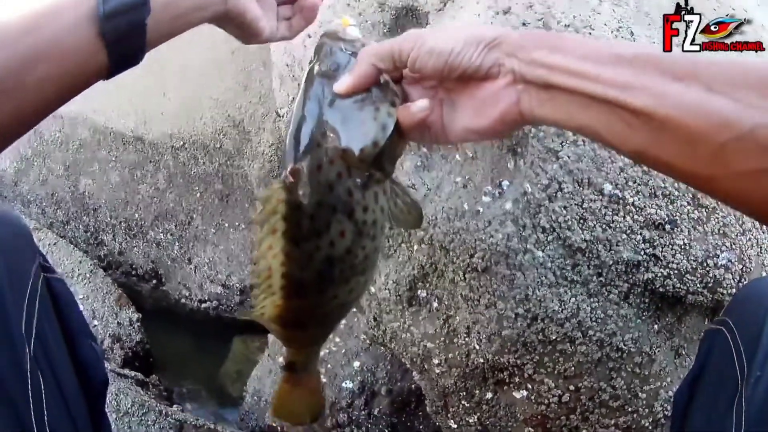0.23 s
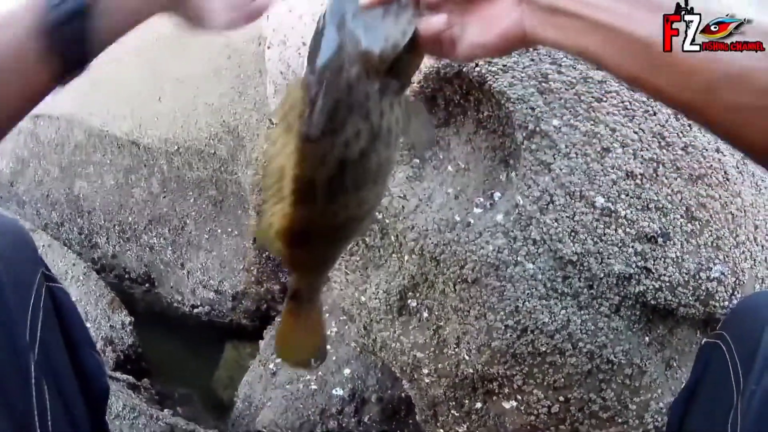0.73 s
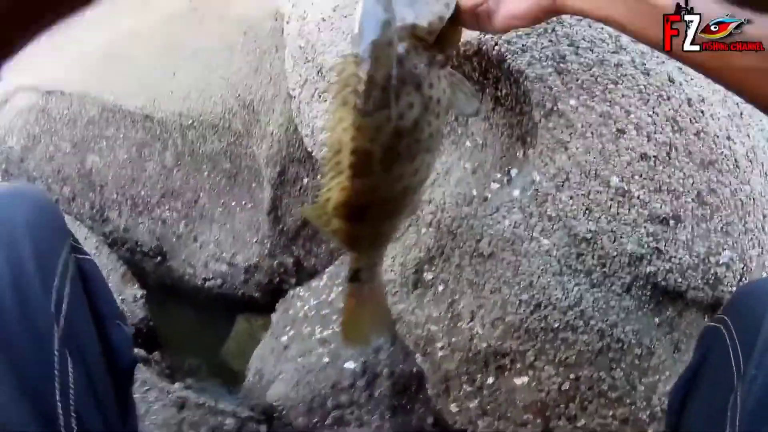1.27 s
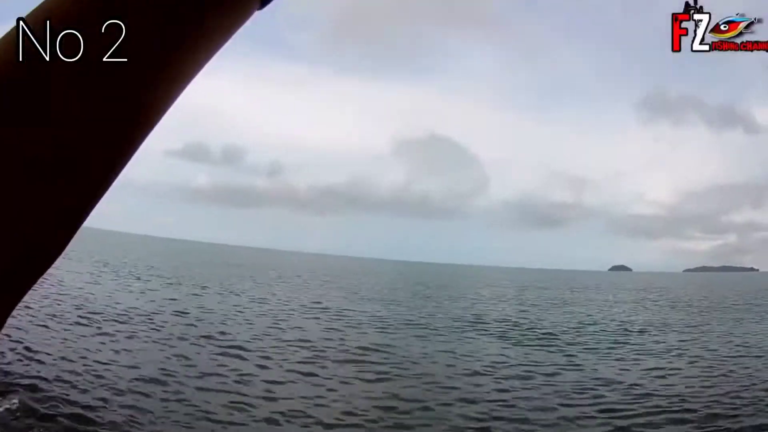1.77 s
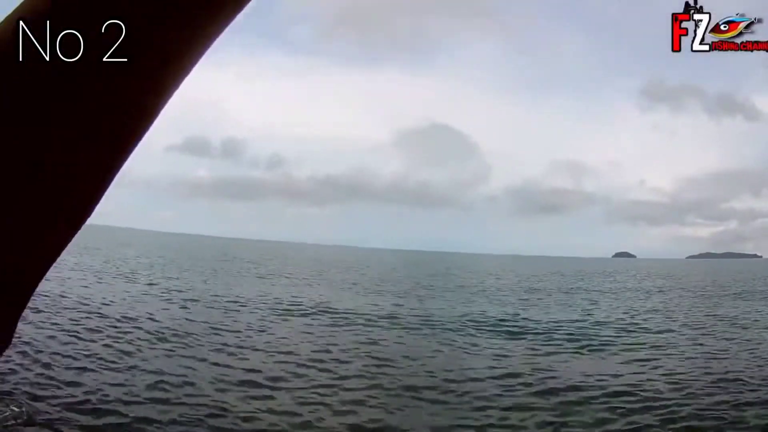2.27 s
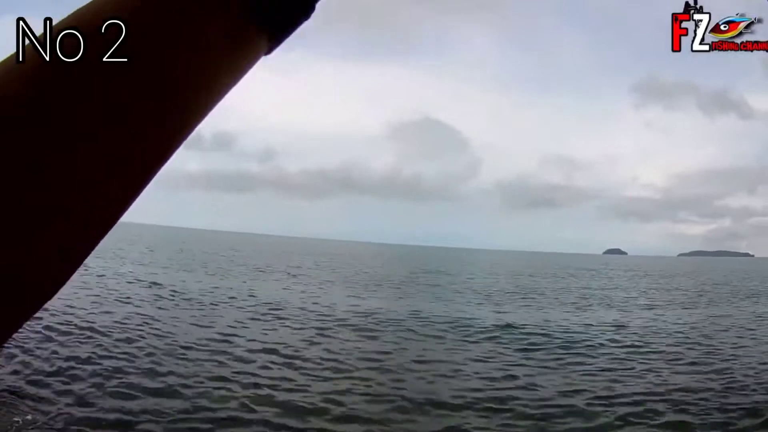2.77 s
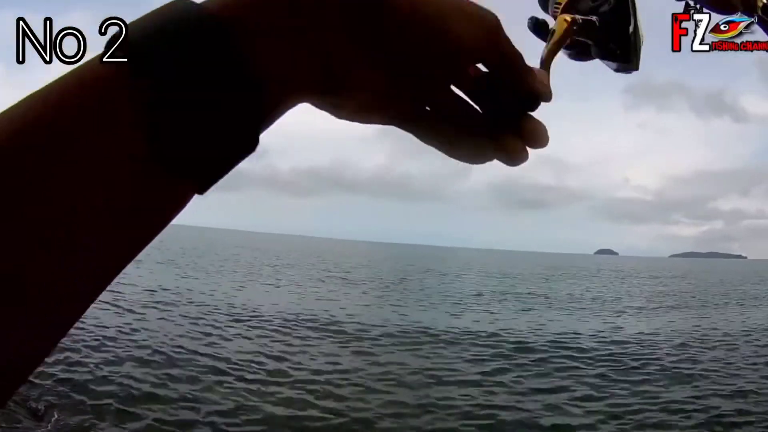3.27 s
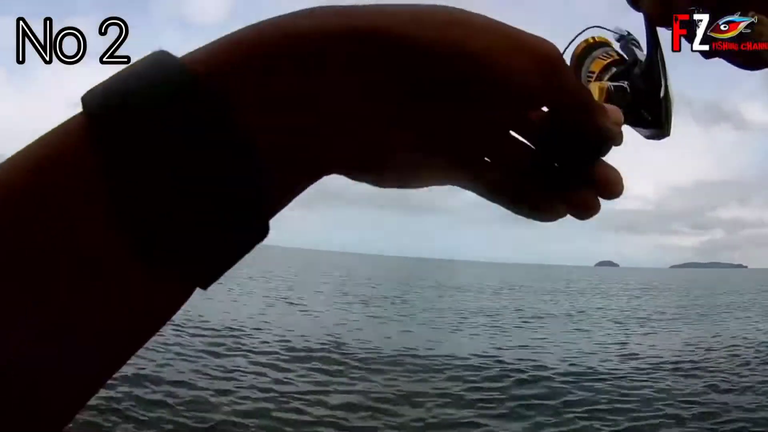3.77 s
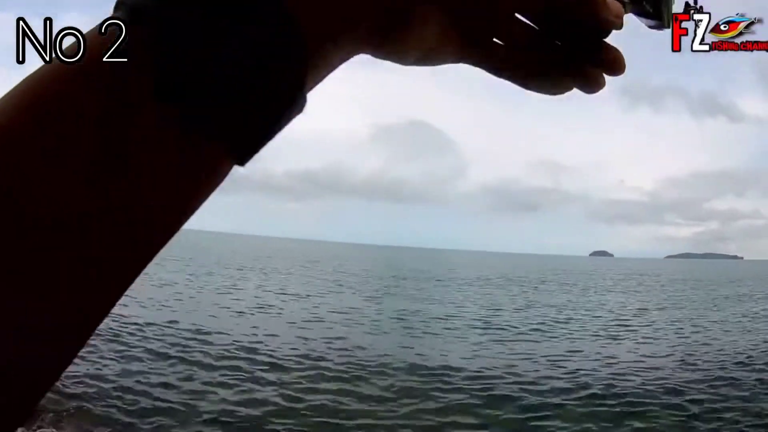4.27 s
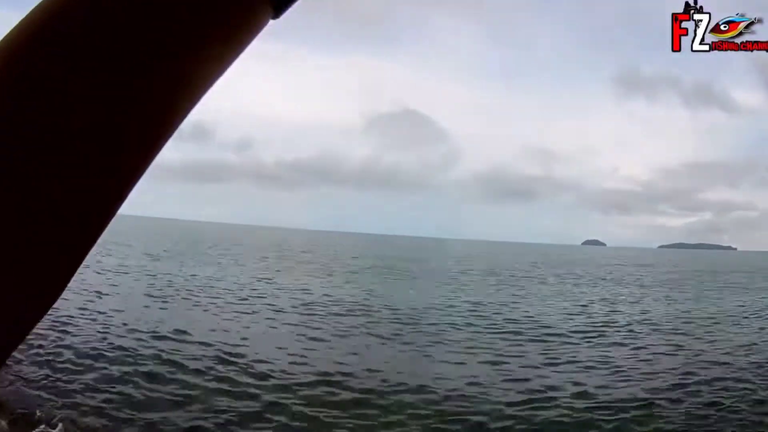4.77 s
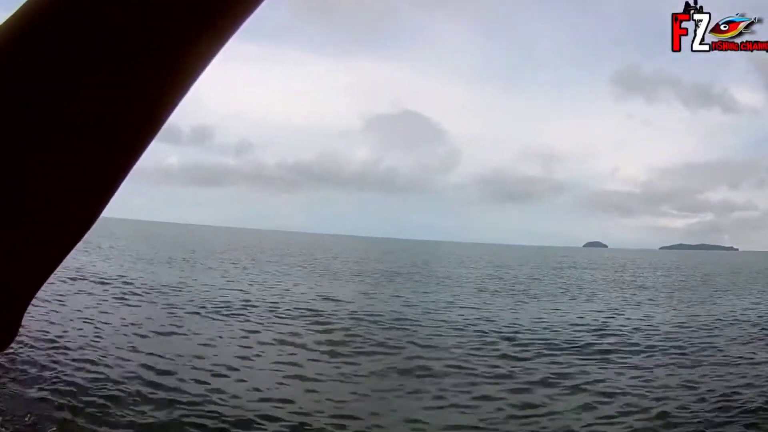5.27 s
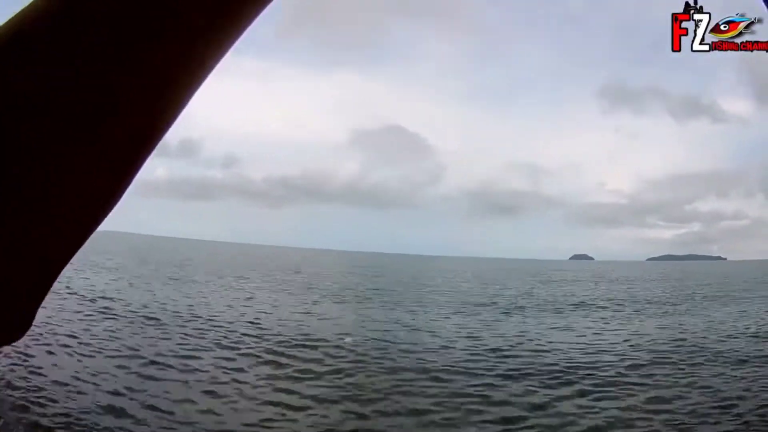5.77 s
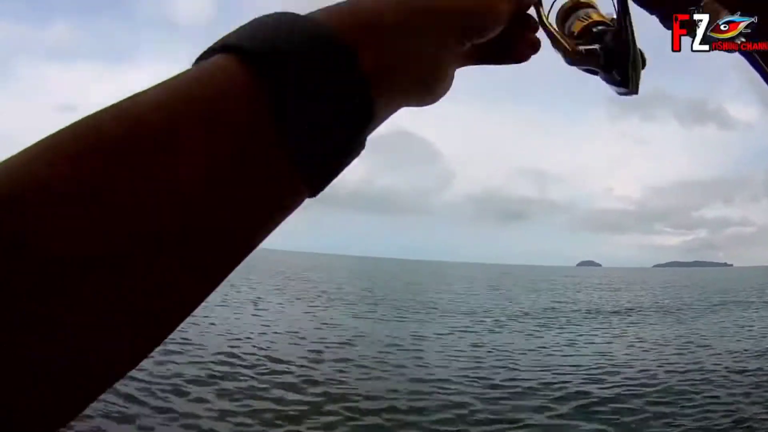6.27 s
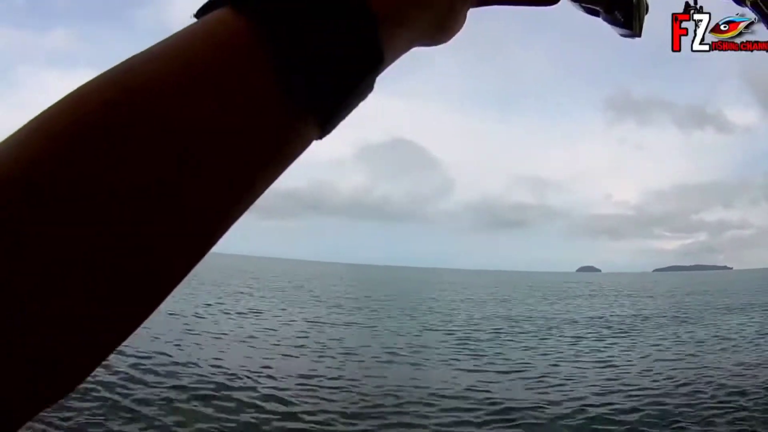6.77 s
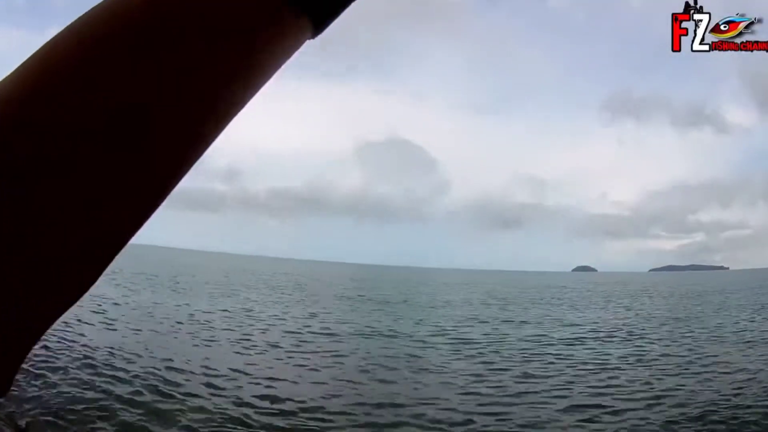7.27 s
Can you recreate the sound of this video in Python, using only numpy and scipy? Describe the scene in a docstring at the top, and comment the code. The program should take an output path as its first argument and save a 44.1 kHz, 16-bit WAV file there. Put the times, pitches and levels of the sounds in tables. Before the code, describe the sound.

Water drips faintly into a quiet rock pool over a low hum. After about a second, a hand bumps the microphone housing with a quick, rattling knock. The sound cuts to the sea lapping against shore rocks: a soft, wavering rush with hollow gulps, small slaps and droplet ticks, growing louder near the end. Everything sounds close and muffled, as if heard through a case.

```python
"""Rock pool and lapping sea

Water drips among quiet rocks while hands, shifting a wet catch, knock the camera housing. The scene
then changes to the sea lapping at the shore. Each bubble rings as a mass of water on a spring of air:
countless tiny ones merge into a rush, and larger ones gulp singly. Spray, droplets and the knocks add
short cracks and ticks. The housing around the single microphone muffles the rush and the cracks."""
import sys
import numpy as np
from scipy import signal
from scipy.fft import rfft, irfft, next_fast_len
from scipy.io import wavfile
from scipy.ndimage import uniform_filter1d

SR = 44100
rng = np.random.default_rng(int(sys.argv[2]) if len(sys.argv) > 2 else 0)


def wav_record(signal):
    """Record a signal, one row per channel, as 16-bit PCM in the file named by sys.argv[1]."""
    frames = np.transpose(np.atleast_2d(signal))
    bounded = np.clip(frames, -1, 1)
    # unit amplitude maps onto the largest positive 16-bit level
    quanta = np.round(bounded * 32767).astype(np.int16)
    wavfile.write(sys.argv[1], SR, quanta)


N = 332073
CHANGE_S, GAP_S = 1.325, .004  # the sea follows the pool after a brief silence

# Water heard through the housing. Each row: frequency in Hz, relative level in dB.
HOUSING_SPECTRUM = [(53, -30), (90, -15), (168, -5.5), (539, -1), (672, -2), (985, 0), (1300, -3.5),
                    (1500, -12), (2160, -14.5), (3160, -29.5), (4190, -31), (5120, -38.5), (6390, -38.5),
                    (7970, -47), (11000, -63), (14300, -82), (22000, -120)]
# Edges in Hz of the five water bands: slosh, rush, fizz, spray and mist.
BAND_EDGES_HZ = [0, 300, 1500, 2800, 4800, 22050]
# Water among the rocks. Each row: time in seconds, then the level of each band in dB.
POOL_LEVELS = [(0.0, -63, -65, -79, -87, -89), (0.38, -62, -63, -76, -81, -82),
               (0.54, -62, -55, -63, -81, -87), (0.714, -61, -62.5, -74.5, -79, -83),
               (0.868, -72, -61, -72.5, -80, -84), (1.2, -61.5, -58, -68, -81, -86)]
# Swell of the sea. Each row: time in seconds, then the level of each band in dB.
SEA_LEVELS = [(1.34, -58.5, -43.5, -66, -74, -81), (1.42, -55, -43.5, -58, -68, -77),
              (1.53, -55.5, -44.5, -59, -69, -77), (2.03, -57, -45, -60.5, -71.5, -78.5),
              (2.29, -58.5, -42, -55, -68, -76.5), (2.44, -50, -40, -55.5, -68, -73.5),
              (2.92, -58, -43.5, -57, -68.5, -75), (3.22, -51.5, -42, -51.5, -63.5, -69.5),
              (3.44, -61, -42.5, -56.5, -67.5, -76), (3.72, -55.5, -42, -58, -69.5, -75.5),
              (4.53, -54, -40.5, -59, -68.5, -76.5), (4.72, -54.5, -43.5, -60.5, -68.5, -78.5),
              (4.99, -60, -45.5, -61, -70.5, -79), (5.67, -62, -43, -57.5, -71.5, -76.5),
              (5.87, -54, -41, -53.5, -64, -75.5), (6.22, -49, -35.5, -49, -60, -72.5),
              (6.61, -48, -38.5, -52.5, -62, -75.5), (6.94, -45, -33, -47.5, -59.5, -66.5),
              (7.13, -52.5, -37.5, -49.5, -61.5, -69.5), (7.53, -53, -39, -53.5, -63.5, -71)]
# Wavelets on rock. Each row: crest time in seconds, fall time in seconds, then twice the rise in dB
# of the rush, of the slosh and of the three upper bands.
WAVELETS = [(1.267, 0.065, 11, 9, -3), (1.386, 0.035, -5, -2, 11), (1.57, .04, 2, 2, 0),
            (1.669, 0.028, 0, 27, 8), (1.742, 0.042, 17.5, 13, 13), (1.887, 0.083, 4.5, 9, -2),
            (2.067, 0.043, 16, 6, 17), (2.252, 0.033, 3, 13, 9), (2.324, .05, -1.5, 5, -5),
            (2.487, 0.032, 12, 7, 3), (2.657, 0.07, 10.5, -8, 2), (2.8, .04, 1, -2, -2),
            (2.915, 0.082, 5, 17, 2), (3.066, 0.099, 12, 17, 6.5), (3.18, 0.025, 9, 5, 6),
            (3.3, 0.083, 6, -11, 3), (3.45, 0.059, 4, 3, 1), (4.158, 0.062, 1.5, -2, 5),
            (4.36, .05, 2.5, -7, -5), (4.626, .05, 4, -2, -6), (4.732, 0.045, 2, 1, 5),
            (5.29, 0.061, 6, 7, 4), (5.495, 0.046, 2, 14, -7), (5.66, .04, -5, -5, -1),
            (5.807, 0.028, -1, 1, 11), (6.032, 0.068, 8.5, -1, 2.5), (6.144, 0.026, 3, 18, 6),
            (6.252, 0.032, 6, 11, -4), (6.305, 0.028, 11.5, 4, 9), (6.455, 0.18, 6, -5, 1.5),
            (6.55, 0.065, 3, 11, 9), (6.75, 0.037, 8, 0, 6), (6.862, 0.04, 5, 8.5, -1),
            (7.06, 0.033, 4.5, 5, 5), (7.295, 0.042, 1, -5, 4), (7.396, 0.036, 1.5, 1, -4)]
# Wind rumble and microphone hiss. Each row: frequency in Hz, spectral density in dB.
AIR_SPECTRUM = [(15, -78), (30, -90), (60, -78), (100, -85), (200, -104.5), (400, -100), (1500, -112),
                (4000, -119), (7000, -120), (9000, -119), (12000, -122), (15500, -119)]
# Low resonances. Each row: frequency in Hz, bandwidth in Hz, level in dB before filtering.
HUM_BANDS = [(63, 14, -64.5), (95, 8.3, -64.5), (131, 8.9, -65.5), (180, 38, -63), (332, 420, -62)]
# Drips into the pool. Each row: peak time in seconds, peak level in dB, pitch in Hz.
POOL_DRIPS = [(0.339, -45, 1136), (0.378, -49, 1310), (0.384, -40.5, 408), (0.416, -40, 1030),
              (0.422, -50, 1500), (0.461, -53, 1190), (0.468, -43, 895), (0.511, -40, 990),
              (0.549, -39, 344), (0.56, -46, 1500), (0.566, -49, 344), (0.581, -43.5, 1230),
              (0.652, -53, 1600), (0.678, -45, 602), (0.782, -50, 820), (0.81, -56, 1730),
              (0.822, -51, 1421), (0.898, -58, 2360), (0.925, -47.5, 604), (0.985, -54, 1873),
              (0.975, -55, 620), (1.059, -47, 555), (1.16, -48, 600), (1.215, -49, 1300)]
# Short noisy cracks: slaps of spray and the crack of knocks on the housing. Each row: time in seconds,
# level in dB before filtering, seconds to fall by 60 dB, brightness from 0 to 1.
NOISY_CRACKS = [(0.3856, -52.5, 0.053, 0.3), (0.4544, -54, 0.07, 0.6), (0.4748, -54.5, 0.061, 1),
                (0.5427, -54, 0.032, 0.54), (0.5612, -57, 0.039, 0.54), (1.23, -50.5, 0.042, 0),
                (1.2655, -44.5, 0.027, 0), (1.3429, -48.5, 0.062, 0.5), (1.4003, -46, 0.063, 0.38),
                (1.768, -47, 0.05, 0.8), (2.064, -53, 0.11, 0.6), (2.0984, -49, 0.097, 1),
                (2.139, -48.5, 0.11, 0.8), (3.0243, -56, 0.06, 0.8), (3.1904, -42.5, 0.06, 1),
                (5.2687, -51, 0.07, 0.36), (5.7821, -48.5, 0.072, 0.2), (6.084, -45, 0.047, 0.6),
                (6.2966, -51, 0.062, 0.4), (6.54, -38.5, 0.034, 0.25), (6.77, -44, 0.018, 0)]
# Short high ticks: droplets, and the click of a knock on the housing.
# Each row: peak time in seconds, peak level in dB, pitch in Hz.
HIGH_TICKS = [(0.4554, -59, 4070), (0.5427, -57, 3260), (1.233, -46.5, 4230), (1.3683, -57, 2940),
              (1.4514, -51, 2900), (2.0677, -52, 3020), (2.0844, -48, 2800), (2.0981, -49, 3080),
              (2.1849, -54, 3950), (2.2603, -50, 3020), (3.4144, -53, 2800), (3.5972, -50.5, 3610),
              (4.0716, -52, 4140), (4.346, -48, 3840), (5.0789, -63, 8940), (5.1244, -63, 9720),
              (5.7314, -49.5, 4060), (5.8835, -52, 3660), (5.9768, -46.5, 3200), (6.4847, -52, 4030),
              (6.8154, -51, 3270), (6.8967, -49, 3740), (6.9112, -54, 2870)]
# Knocks on the housing. Each row: peak time in seconds, level in dB, gain of the overtones in dB.
HOUSING_KNOCKS = [(1.23, -40, -4), (1.24, -26, -14), (1.251, -29.5, -22), (1.268, -26, -3),
                  (1.276, -40, -19), (1.287, -32.5, -15), (1.303, -44, -16), (1.315, -47, -23)]
# Modes of the housing. Each row: frequency in Hz, relative level in dB, ring time in milliseconds.
HOUSING_MODES = [(620, 0.5, 6.8), (1020, -8, 5.), (1730, -14, 1.6), (2368, -15.5, 2.4)]
# Dull blows. Each row: peak time in seconds, peak level in dB, pitch in Hz.
DULL_BLOWS = [(1.268, -37.5, 126), (1.83, -42, 148), (6.092, -36.5, 154), (6.546, -40, 146)]
# Trapped air. Each row: peak time in seconds, peak level in dB, pitch in Hz, ring time in milliseconds.
AIR_POCKETS = [(1.477, -36, 1040, 12), (1.57, -39.5, 475, 18), (1.675, -35, 324, 29), (1.69, -36, 354, 27),
               (1.738, -27, 870, 5.8), (1.749, -20.5, 990, 2.5), (1.761, -30, 850, 14),
               (1.825, -32.5, 258, 5.1), (1.977, -37, 870, 8.2), (2.07, -25, 960, 6.4),
               (2.074, -32.5, 580, 14.2), (2.079, -30, 1110, 11), (2.33, -40, 282, 17.7),
               (2.369, -32, 1110, 4.5), (2.494, -35, 875, 8), (2.667, -29.5, 1166, 10),
               (2.762, -37, 610, 14.6), (2.797, -37, 314, 23), (2.926, -36, 1094, 12),
               (3.039, -32, 645, 3.6), (3.069, -33, 1260, 7.2), (3.071, -26.5, 387, 4.6),
               (3.084, -28, 826, 8.6), (3.114, -23, 420, 3.7), (3.115, -33.5, 1020, 7.4),
               (3.17, -34, 610, 7), (3.189, -29, 1275, 5.7), (3.21, -27, 356, 4), (3.289, -39, 676, 25),
               (3.434, -32.5, 1140, 7.6), (3.517, -32, 689, 4.6), (3.801, -36.5, 810, 17),
               (3.862, -32, 523, 8.1), (4.175, -29.5, 1086, 8), (4.205, -32, 495, 9.5),
               (4.359, -27, 570, 1.9), (4.378, -34, 1030, 7.8), (4.521, -31, 1130, 5.1),
               (4.543, -38.5, 372, 24), (4.629, -39, 906, 10), (4.666, -34, 1190, 9.7),
               (4.838, -40.5, 394, 15.6), (5.014, -39, 590, 19.5), (5.082, -38, 920, 10),
               (5.24, -44, 274, 20), (5.272, -35, 473, 5.2), (5.294, -39, 600, 14), (5.38, -39, 910, 6.5),
               (5.489, -32.5, 303, 10.2), (5.525, -40, 294, 25), (5.65, -40, 450, 18),
               (5.75, -37.5, 330, 15.6), (5.924, -26, 715, 4.1), (5.99, -33.5, 443, 15.5),
               (6.05, -32, 470, 20), (6.23, -22, 547, 2.9), (6.239, -32, 1170, 8.4), (6.26, -20, 934, 5.7),
               (6.303, -17, 1054, 5), (6.312, -26, 1060, 3.5), (6.411, -31, 714, 5.3),
               (6.436, -28, 865, 10), (6.554, -28.5, 580, 6.8), (6.726, -38, 760, 4.8),
               (6.855, -20.5, 1080, 4.4), (6.862, -15, 566, 8.1), (6.932, -26, 780, 6.6),
               (7.043, -25, 555, 6.7), (7.166, -38, 620, 12), (7.396, -31, 710, 4.4)]
# Left-right difference. Each row: frequency in Hz, level in dB relative to the common signal.
SIDE_SPECTRUM = [(60, -26), (200, -50), (700, -39), (1300, -69.5), (4400, -41.5), (8000, -33), (15000, -20)]
# Notch of the microphone port. Its values: centre in Hz, width in Hz, gain in dB.
PORT_NOTCH = (7820, 550, -5.5)


def gain_of(db):
    """Amplitude grows tenfold with every 20 dB."""
    return 10 ** (np.asarray(db) / 20)


def unit_rms(x):
    """Dividing by the root mean square gives unit power."""
    return x / np.sqrt(np.mean(x ** 2) + 1e-20)


def level_at(spectrum, hz):
    """A spectrum is interpolated on a logarithmic frequency axis."""
    freqs, levels = np.transpose(spectrum)
    return np.interp(np.log(hz + 1), np.log(freqs + 1), levels)


def filtered(x, spectrum):
    """A linear filter multiplies each frequency by its own gain."""
    size = next_fast_len(len(x))
    gain = gain_of(level_at(spectrum, np.fft.rfftfreq(size, 1 / SR)))
    return irfft(rfft(x, size) * gain, size)[:len(x)]


def add(mix, start_s, sound):
    """Sound pressures add by superposition."""
    part = mix[round(start_s * SR):][:len(sound)]
    part += sound[:len(part)]


def ring(hz, ms, glide, rise):
    """A damped resonator peaks at the fraction `rise` of its ring time and decays as its pitch glides."""
    age = np.arange(0, 4 * ms / 1000, 1 / SR) / (ms / 1000)  # in ring times
    envelope = ((age / rise) * np.exp(1 - age / rise)) ** 1.42
    pitch = hz * (1 + glide * (age - rise))
    return envelope * np.sin(2 * np.pi * np.cumsum(pitch) / SR)


def rings(rows, glide, rise):
    """Damped oscillations superpose, each peaking at its given time."""
    out = np.zeros(N)
    for peak_s, db, hz, ms in rows:
        add(out, peak_s - rise * ms / 1000, gain_of(db) * ring(hz, ms, glide, rise))
    return out


def rush(patch_db=1.87, flicker_db=-0.76):
    """Countless tiny bubbles sum incoherently to noise, with drifting patches and a common flicker."""
    frames = N // 128 + 5
    real, imag, patches = rng.standard_normal((frames, 257, 3)).T
    patches = uniform_filter1d(patches, size=7, axis=0)  # across frequency
    patches = unit_rms(uniform_filter1d(patches, size=18, axis=1))  # across time
    flicker = unit_rms(uniform_filter1d(rng.standard_normal(frames), size=14))
    spectra = (real + 1j * imag) * gain_of(patch_db * patches + flicker_db * flicker)
    return unit_rms(signal.istft(spectra, nperseg=512, noverlap=384)[1][:N])


def gurgle(base_per_s=900, spread_db=2.0, sizes=40):
    """Bubbles arrive in random clumps and resonate by size; smaller ones tend to decay sooner."""
    clumps = gain_of(3 * unit_rms(uniform_filter1d(rng.standard_normal(N), size=2000)))
    chance, strength, size = rng.random((N, 3)).T
    born = chance < base_per_s * clumps / SR
    impulses = born * gain_of(spread_db * np.minimum(-np.log(strength + 1e-9), 4))
    size_index = (size * sizes).astype(int)
    out = np.zeros(N)
    for k, hz in enumerate(np.geomspace(200, 6500, sizes)):
        ms = 9 * (500 / hz) ** 0.52 * rng.uniform(0.49, 2.06)
        bubble = ring(hz, ms, glide=0.026, rise=0.3)
        bubble *= hz ** 0.23 / np.linalg.norm(bubble)
        out += signal.oaconvolve(impulses * (size_index == k), bubble)[:N]
    return unit_rms(out)


def lapping(rise_to_fall=0.4, lull=0.22):
    """Wavelets, each within a lull, ride on a slow swell and modulate the five band levels in dB."""
    step = [(CHANGE_S, *POOL_LEVELS[-1][1:]), (CHANGE_S, *SEA_LEVELS[0][1:])]
    swell_s, *swells = np.transpose([*POOL_LEVELS, *step, *SEA_LEVELS])
    crest_s, fall_s, *rises = np.transpose(WAVELETS)
    t = np.arange(N) / SR
    coarse = t[::64]
    age = (coarse[:, None] - crest_s) / fall_s
    age = np.where(age < 0, age / rise_to_fall, age)
    shape = (0.5 + lull) * np.exp(-2 * age ** 2) - lull * np.exp(-age ** 2 / 2)
    rush_db, slosh_db, upper_db = (shape @ rise for rise in rises)
    laps = [slosh_db, rush_db, upper_db, upper_db, upper_db]
    levels = [np.interp(coarse, swell_s, swell) + lap for swell, lap in zip(swells, laps)]
    return [np.interp(t, coarse, level) for level in levels]


def water(gurgle_db=-9):
    """Transmission through the housing muffles the bubble noise; each band swells in its own time."""
    bubbles = rush() + gain_of(gurgle_db) * gurgle()
    spectrum = rfft(filtered(bubbles, HOUSING_SPECTRUM))
    hz, out = np.fft.rfftfreq(N, 1 / SR) + 1, np.zeros(N)
    highpass = [np.clip(.5 + 2 * np.log2(hz / (edge + 1)), 0, 1) for edge in BAND_EDGES_HZ]
    for k, level_db in enumerate(lapping()):
        band = irfft(spectrum * (highpass[k] - highpass[k + 1]), N)
        out += gain_of(level_db) * unit_rms(band)
    return out


def air(pool_db=-3):
    """Wind rumble and microphone hiss are broadband noise, a little weaker at the pool."""
    gain = np.where(np.arange(N) < CHANGE_S * SR, gain_of(pool_db), 1)
    return np.sqrt(SR / 2) * filtered(rng.standard_normal(N), AIR_SPECTRUM) * gain


def hum():
    """Noise confined to low resonances wavers as a hum, heard only at the pool."""
    out = np.zeros(N)
    for hz, width, db in HUM_BANDS:
        band = signal.lfilter(*signal.iirpeak(hz, hz / width, SR), rng.standard_normal(N))
        out += gain_of(db) * unit_rms(band)
    return filtered(out, [(300, 3), (1200, 0.5), (4000, -58)]) * (np.arange(N) < CHANGE_S * SR)


def drips(ms_at_1khz=8, trickle_per_s=45, trickle_start_s=0.36, trickle_db=-60):
    """Drips ring as bubbles, the higher ones damped sooner; a faint random trickle runs between them."""
    span_s = CHANGE_S - trickle_start_s
    when, strength, height = rng.random((round(trickle_per_s * span_s), 3)).T
    levels = trickle_db + 9 * (strength - .5) - 14 * height  # higher is fainter
    trickle = zip(trickle_start_s + when * span_s, levels, 600 * 4.5 ** height)
    rows = [(s, db, hz, ms_at_1khz * (1000 / hz) ** 0.43) for s, db, hz in [*POOL_DRIPS, *trickle]]
    return rings(rows, glide=0.029, rise=0.42)


def cracks():
    """Brief impacts are broadband; the housing takes their treble, less from the bright near ones."""
    out, t = np.zeros(N), np.arange(6000) / SR
    reference_db = level_at(HOUSING_SPECTRUM, 4270)
    for s, db, t60, brightness in NOISY_CRACKS:
        attack = np.minimum(t / (0.077 * t60), 1)
        burst = attack * gain_of(db - 60 * t / t60) * rng.standard_normal(len(t))
        colour = [(hz, level - reference_db + brightness * 6 * np.log2(min(hz, 5000) / 4000))
                  for hz, level in HOUSING_SPECTRUM]
        padded = np.pad(burst, round(.01 * SR))  # room for the filter to ring
        add(out, s - .011, filtered(padded, colour))
    return out


def ticks(cycles=7.1):
    """Short high ticks ring for a set number of cycles, so ring time varies inversely with pitch."""
    rows = [(s, db, hz, 1000 * cycles / hz) for s, db, hz in HIGH_TICKS]
    return rings(rows, glide=.02, rise=0.4)


def knocks():
    """An impact excites the normal modes of the housing; hard ones wake more of its overtones."""
    rows = [(s, db + mode_db + (k > 0) * overtone_db, hz, ms)
            for s, db, overtone_db in HOUSING_KNOCKS
            for k, (hz, mode_db, ms) in enumerate(HOUSING_MODES)]
    return rings(rows, glide=0.033, rise=0.41)


def thuds(ring_ms=21):
    """A dull blow is a heavily damped low oscillation whose pitch sags."""
    return rings([(*blow, ring_ms) for blow in DULL_BLOWS], glide=-0.034, rise=0.35)


def gulps():
    """Large pockets of trapped air pulsate at their natural frequency, which creeps upward."""
    return rings(AIR_POCKETS, glide=0.011, rise=0.3506)


def scene():
    """All sources superpose at one microphone; at the sea a faint random-phase difference sets the left and
    right channels slightly apart."""
    mid = water() + drips() + cracks() + ticks() + knocks() + thuds() + gulps() + hum() + air()
    t = np.arange(N) / SR
    outside_gap_s = abs(t - CHANGE_S - GAP_S / 2) - GAP_S / 2
    mid *= np.clip(outside_gap_s * 1000, 0, 1)  # 1 ms fades
    hz, _, spectra = signal.stft(mid, SR, nperseg=1024)
    phases = np.exp(2j * np.pi * rng.random(spectra.shape[::-1]).T)
    side_spectra = spectra * phases * gain_of(level_at(SIDE_SPECTRUM, hz))[:, None]
    side = signal.istft(side_spectra, SR, nperseg=1024)[1][:N] * (t > CHANGE_S)
    return np.array([mid + side, mid - side])


def record(dry):
    """Cancellation in the microphone port weakens one narrow band; a low-pass limits the treble."""
    size = next_fast_len(N)
    centre_hz, width_hz, db = PORT_NOTCH
    hz = np.fft.rfftfreq(size, 1 / SR)
    notch = gain_of(db * np.exp(-((hz - centre_hz) / width_hz) ** 2))
    ported = irfft(rfft(dry, size) * notch, size)[:, :N]
    lowpass = signal.firwin(2047, cutoff=15730, window=("kaiser", 6), fs=SR)
    return signal.oaconvolve(ported, lowpass[None], "same")


dry = scene()
out = record(dry)
wav_record(out)
```